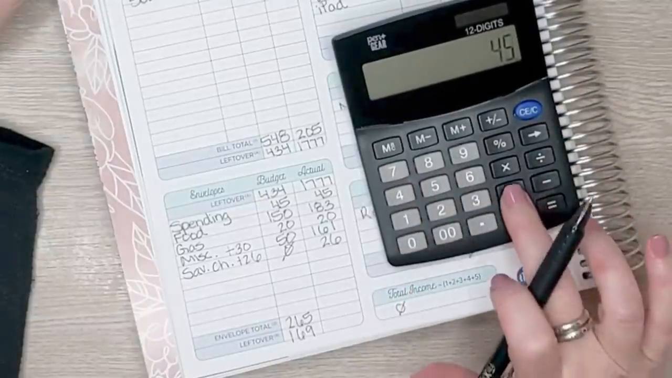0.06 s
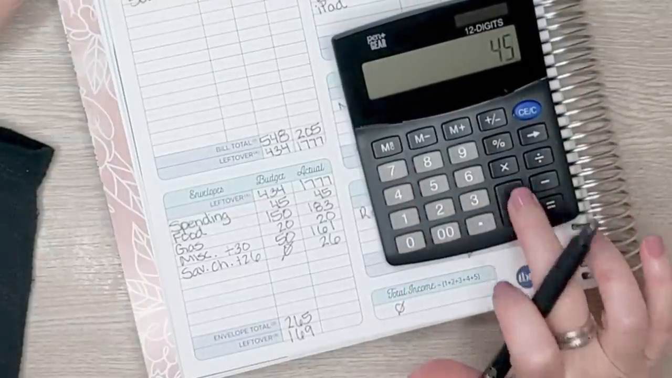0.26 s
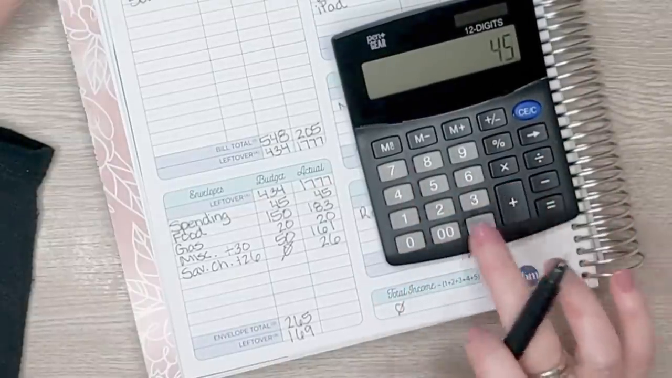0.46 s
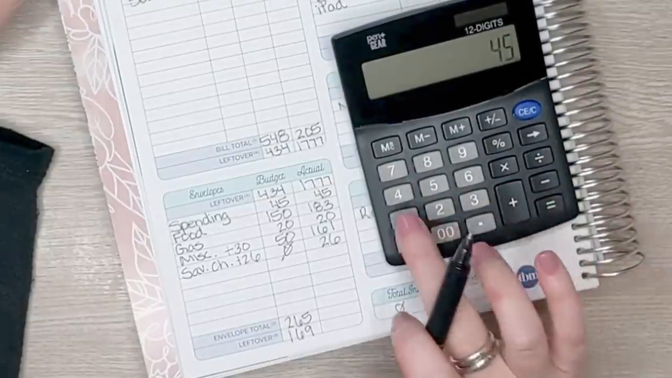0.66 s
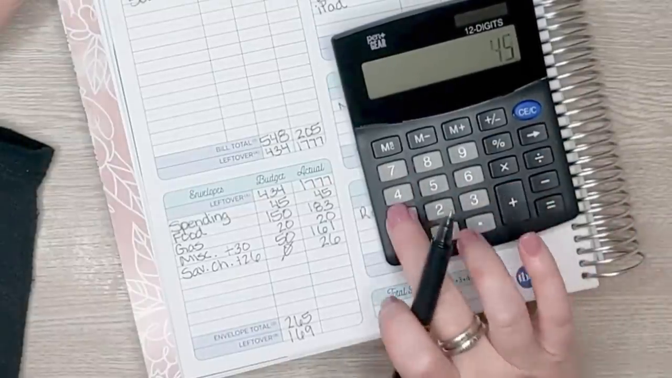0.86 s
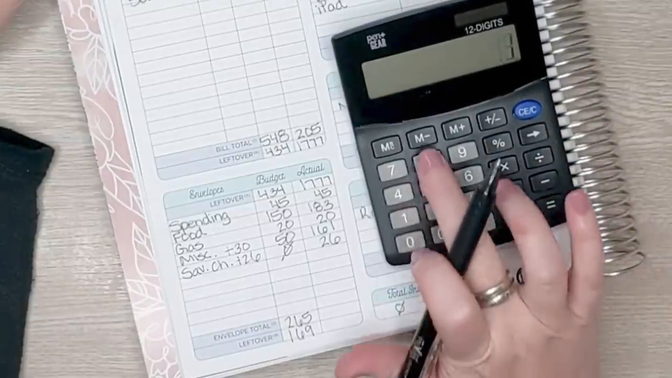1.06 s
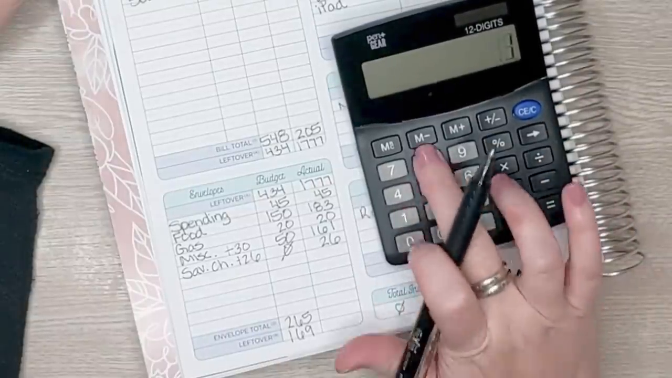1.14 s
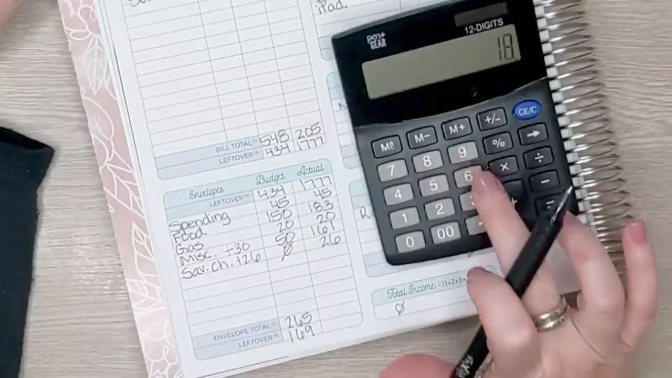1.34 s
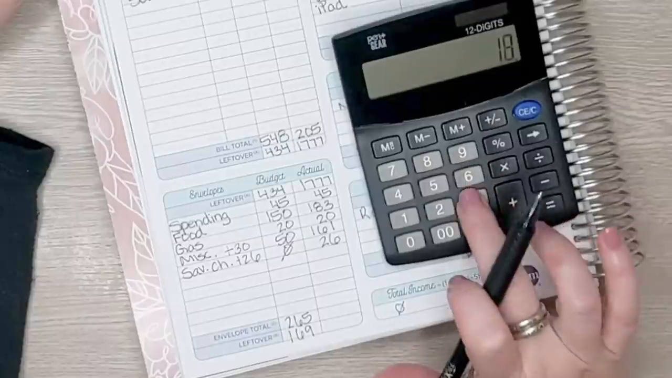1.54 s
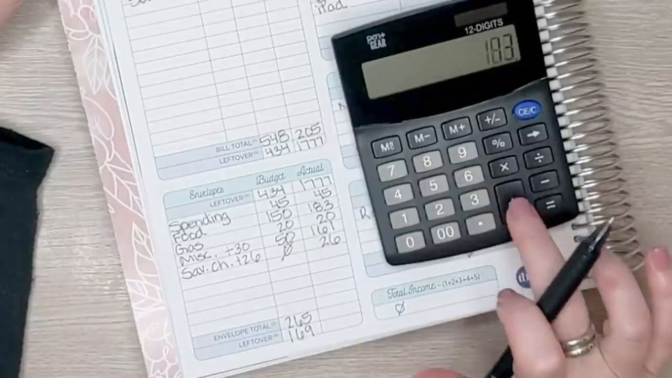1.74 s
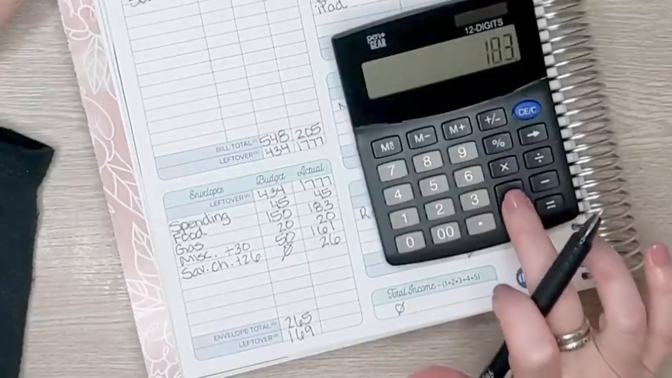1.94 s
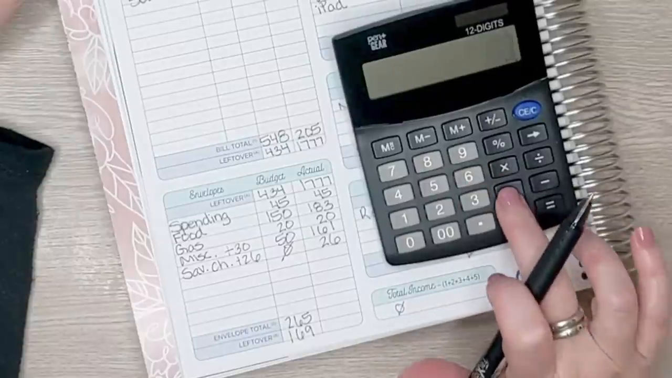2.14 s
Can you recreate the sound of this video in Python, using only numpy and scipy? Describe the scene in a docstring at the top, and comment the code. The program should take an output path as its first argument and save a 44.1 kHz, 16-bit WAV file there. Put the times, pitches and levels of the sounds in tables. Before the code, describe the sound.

Plastic calculator keys click close to the microphone: one firm press, a short gap, then three lighter presses. Each knocks the hollow case and clicks back up, with brief room ring over a low rumble and faint hum.

```python
"""Calculator keys on a desk

Four keys of a plastic desktop calculator are pressed; it lies on a paper planner on a desk.
Each key clicks under the finger, knocks the hollow case as it bottoms out, and clicks again as it
springs back. A small quiet room rings briefly after each stroke, over a low rumble and a faint hum."""
import sys
import numpy as np
from scipy import signal
from scipy.fft import rfft, irfft
from scipy.io import wavfile
from scipy.ndimage import uniform_filter1d

SR = 44100
rng = np.random.default_rng(int(sys.argv[2]) if len(sys.argv) > 2 else 0)


def waveform_to_disk(signal):
    """Save audio, clipped to [-1, 1], as 16-bit WAV at the path in sys.argv[1]."""
    frames = np.transpose(np.atleast_2d(signal))
    scaled = np.clip(frames, -1, 1) * 32767
    samples = np.round(scaled).astype(np.int16)
    wavfile.write(sys.argv[1], SR, samples)


N = 97020

# loose key caps, touched or let go:
# t/s, level/dB, rattle hold/s, ring f/Hz, ring boost/dB, treble tilt/(dB per octave), left-right/dB
CAP_CLICKS = [ (0.2177, -17, 0.0019, 1460, -9, -1, 2), (.2200, -7, 0.0022, 3050, 11, -1, -3),
              (0.3476, -9, 0.0064, 6100, 3, 1.5, 1), (.3492, -6.5, 0.0016, 1495, 10.5, -3.5, -0.5),
              (0.9057, -27.5, 0.005, 2320, 2, -3, -8), (0.9077, -22, 0.0023, 2970, 17, 7, 0.5),
              (0.9101, -16, 0.0069, 1210, 13, 3.5, -1), (1.003, -15.5, 0.004, 2230, 6.5, -2, -1.5),
              (1.0083, -18, 0.0044, 3740, 6.5, -0.5, -1.5), (1.2118, -18, 0.0082, 2000, -3.5, -9.5, 2),
              (1.233, -28.5, 0.0008, 3030, 7, -4, -6), (1.2458, -29, 0.0016, 5070, 12, 9, -1),
              (1.3052, -27.5, 0.0045, 3160, 13, 2, 8.5), (1.3102, -12, 0.0042, 4240, 3.5, 3.5, -0.5),
              (1.622, -17, 0.0037, 2020, 3, 2.5, -2), (1.639, -24.5, 0.0062, 1660, 5, -5, 0),
              (1.7390, -25.5, 0.0016, 3220, 8, 2, 2), (1.748, -25.5, 0.0025, 880, 11.5, 1.5, 15.5),
              (1.7496, -19, 0.004, 2560, 4.5, 0, -7)]
# keys bottoming out: t/s, level/dB, dull above f/Hz, struck spot f/Hz, spot boost/dB,
# low body/dB, desk thud gain/dB
KEY_KNOCKS = [ (0.2201, -4.5, 3530, 600, 8, 4.5, -44), (0.9176, -21, 1250, 470, 17, -1, -41.5),
              (1.2192, -11.5, 1050, 1020, 9, -2.5, -43), (1.6430, -21.5, 1680, 1220, 2.5, 1, -56)]
# modes of the hollow case: f/Hz, relative level/dB, t60/s
CASE_MODES = [(355, -12, 0.087), (473, -14.5, 0.078), (586.5, -10, 0.1), (736, -13, 0.052),
              (864, -4.5, 0.024), (1050, -10.5, 0.0084), (1291, -2, 0.049), (1455, -9, 0.025),
              (2190, -10, .02), (2190, -8, 0.012), (2510, -14, 0.0055), (2900, 0, 0.0067),
              (2974, -5, 0.014)]
# modes of the desk under the planner: f/Hz, relative level/dB, t60/s
DESK_MODES = [(63, -18, 0.4), (110.3, -4.5, 0.38), (131.5, -15.5, 0.17), (184, -36, 0.073)]
# EQ of a rattling cap: f/Hz, gain/dB
CAP_EQ = [(100, -29), (350, -13.5), (650, -4.5), (950, -1), (1150, -2), (1550, 2.5), (1900, 0), (2300, 3),
          (2750, -4), (3400, -2), (4200, -6), (5200, -4), (6100, -3.5), (7500, -9.5), (9500, -17.5),
          (13000, -22), (16000, -23.5)]
# EQ of the crack of the case: f/Hz, gain/dB
CRACK_EQ = [(100, -4), (230, -27.5), (350, -8), (900, -5.5), (1400, 1.5), (1700, -4), (2200, 7.5),
            (3200, -3), (4200, -10), (8000, -1), (16000, -21)]
# stereo lean of the direct sound: f/Hz, left-right/dB
STEREO_LEAN = [(300, 1.5), (700, 2.5), (1400, 5.5), (2500, -3.5), (4500, 1.5), (6200, -1), (9000, 2),
               (14000, -4)]
# colour of the wall reflections: f/Hz, gain/dB
WALL_EQ = [(100, -6), (300, -3), (620, 3), (1000, 1), (1400, -4), (2100, 1), (2950, -0.5), (4100, 0),
           (6000, -3.5), (10000, 1.5), (16000, -0.5)]
# decay of the reverb tail: f/Hz, t60/s
TAIL_T60 = [(150, 1), (600, 0.46), (1500, 0.43), (2900, 0.34), (4500, 0.37), (8000, 0.34), (15000, 0.22)]
# EQ of the rumble and hiss: f/Hz, gain/dB
AIR_EQ = [(15, -44), (31, -22), (42, -11.5), (55, 2.5), (68, -3.5), (82, -12.5), (112, -2.5), (165, -13.5),
          (270, -16.5), (350, -17), (530, -20.5), (1100, -22.5), (2000, -27.5), (5300, -32.5),
          (10000, -38.5), (16000, -46.5)]
# partials of the hum: f/Hz, level/dB
HUM_PARTIALS = [(112, -77), (222, -75), (333, -74)]

AIR_DB, AIR_SPREAD_HZ = -58, 204
CAP_T60_S, RATTLE_ATTACK_S, RATTLE_RELEASE_S = 0.018, 0.00046, 0.0015
CAP_Q, SPOT_Q = 4.5, 3
CRACK_DB, CRACK_DECAY_S, CASE_ATTACK_S, THUD_ATTACK_S = 2.5, 0.0034, 0.00024, 0.0021
REBOUND_DELAY_S, REBOUND_DB = 0.00227, -9
LEFT_LAG_S, SPREAD_HZ = 0.0001, 5450  # the keys sound wide above this pitch
TAIL_DB, TAIL_BUILD_S = -5, 0.0017
EARLY_DB, EARLY_DELAY_S, EARLY_DECAY_S = -11.5, 0.0065, 0.0051
LOW_CUT_HZ, HIGH_CUT_HZ = 39, 15900
HIT_T = np.arange(8192) / SR  # time axis of one hit


def undb(db):
    """Decibels to gain."""
    return 10 ** (np.asarray(db) / 20)


def unit(x):
    """Scale a stereo signal to an average energy of one per channel."""
    return x / np.sqrt(np.sum(x ** 2) / 2)


def fade(t, t60):
    """Exponential decay, 60 dB down after t60."""
    return np.exp(-np.log(1000) * t / t60)


def curve(points, hz):
    """Read a table on a log-frequency axis."""
    f, values = np.array(points, float).T
    return np.interp(np.log(hz + 1), np.log(f), values)


def resonance(f, hz, q, db):
    """Gain in dB of a broad peak of height db at hz."""
    return db / np.sqrt(1 + (q * (f / hz - hz / (f + 1))) ** 2)


def colour(x, db_at):
    """Minimum-phase EQ with the gain db_at(Hz)."""
    n = x.shape[-1]
    gain = undb(db_at(np.fft.rfftfreq(n, 1 / SR)))
    cepstrum = irfft(np.log(gain), n)
    cepstrum[1:n // 2] *= 2
    cepstrum[n // 2 + 1:] = 0
    return irfft(rfft(x) * np.exp(rfft(cepstrum)), n)


def even(x, width_hz=70):
    """Level out the chance peaks and dips in the spectrum of a noise."""
    n = x.shape[-1]
    spectrum = rfft(x)
    power = uniform_filter1d(abs(spectrum) ** 2, size=int(width_hz * n / SR), axis=-1)
    return unit(irfft(spectrum / np.sqrt(power), n))


def stereo(x, spread_hz):
    """Two unrelated signals become a stereo pair, narrow below spread_hz; the right side leads."""
    n = x.shape[-1]
    hz = np.fft.rfftfreq(n, 1 / SR)
    width = np.arctan(hz / spread_hz) / 2
    mid, side = rfft(x) * np.array([np.cos(width), np.sin(width)])
    left = (mid + side) * np.exp(-2j * np.pi * hz * LEFT_LAG_S)
    return irfft(np.array([left, mid - side]), n)


def add(out, at, x):
    """Mix x in at a time in seconds."""
    start = int(at * SR)
    out[:, start:start + x.shape[-1]] += x[..., :N - start]


def room_tone():
    """The bed: low rumble, faint hiss and a slightly wavering hum."""
    noise = stereo(rng.standard_normal((2, N)), AIR_SPREAD_HZ)
    air = unit(colour(noise, lambda f: curve(AIR_EQ, f))) * np.sqrt(N)
    t = np.arange(N) / SR
    drifts = 5 * np.cumsum(rng.standard_normal((len(HUM_PARTIALS), N)), axis=1) / np.sqrt(SR)
    hum = sum(undb(db) * np.sqrt(2) * np.sin(2 * np.pi * hz * t + drift)
              for (hz, db), drift in zip(HUM_PARTIALS, drifts))
    return undb(AIR_DB) * air + hum


def burst(envelope):
    """Dense tiny impacts: a stereo noise burst with an even spectrum."""
    x = rng.standard_normal((2, len(envelope))) * envelope
    for _ in range(3):
        flat = irfft(np.exp(1j * np.angle(rfft(x))))
        x = flat * np.sqrt(envelope)
    return stereo(x, SPREAD_HZ)


def key_clicks():
    """A cap rattles in its guide for a few milliseconds and resonates at its own pitch."""
    out = np.zeros((2, N))
    attack = 1 - np.exp(-HIT_T / RATTLE_ATTACK_S)
    for at, db, hold_s, ring_hz, ring_db, tilt, pan_db in CAP_CLICKS:
        rattle = np.exp(-np.maximum(HIT_T - hold_s, 0) / RATTLE_RELEASE_S)
        grains = burst((rattle + fade(HIT_T, CAP_T60_S)) * attack)

        def cap_eq(f):
            treble = tilt * np.log2(1 + (f / 3500) ** 2) / 2
            return curve(CAP_EQ, f) + resonance(f, ring_hz, CAP_Q, ring_db) + treble

        gains = undb(db + np.array([[pan_db], [-pan_db]]) / 2)
        add(out, at, unit(colour(grains, cap_eq)) * gains)
    return out


def case_ring():
    """The hollow case rings in its modes; the higher ones differ more in phase between the sides."""
    stereo_t = HIT_T - np.array([[LEFT_LAG_S], [0]])
    attack = 1 - np.exp(-HIT_T / CASE_ATTACK_S)
    ring = 0
    for k, (hz, db, t60) in enumerate(CASE_MODES):
        phase = rng.standard_normal((2, 1)) * min(hz / SPREAD_HZ, 2) / 2
        mode = np.sin(2 * np.pi * hz * stereo_t + phase) * fade(HIT_T, t60) * attack
        ring += (-1) ** k * undb(db) * unit(mode)
    return unit(ring)


def case_crack():
    """The short, bright crack of a key hitting its plastic stop."""
    return colour(burst(np.exp(-HIT_T / CRACK_DECAY_S)), lambda f: curve(CRACK_EQ, f))


def desk_thud():
    """The desk answers through the planner with a soft, low thud."""
    ring = sum(undb(db) * np.sin(2 * np.pi * hz * HIT_T) * fade(HIT_T, t60)
               for hz, db, t60 in DESK_MODES)
    return ring * (1 - np.exp(-HIT_T / THUD_ATTACK_S))


def key_knocks():
    """The key hits its stop and rebounds: the case cracks and rings, the desk thuds."""
    out = np.zeros((2, N))
    for at, db, dull_hz, spot_hz, spot_db, body_db, thud_db in KEY_KNOCKS:
        def touch_eq(f):
            body = body_db / (1 + (f / 450) ** 4)
            dulling = 10 * np.log10(1 + (f / dull_hz) ** 8)  # a soft fingertip takes off the top
            return resonance(f, spot_hz, SPOT_Q, spot_db) + body - dulling

        strike = case_ring() + undb(CRACK_DB) * unit(case_crack())
        knock = unit(colour(strike, touch_eq))
        rebound = unit(colour(case_crack(), touch_eq))
        add(out, at, undb(db) * knock)
        add(out, at + REBOUND_DELAY_S, undb(db + REBOUND_DB) * rebound)
        add(out, at, undb(thud_db) * desk_thud())
    return out


def room_reverb(x):
    """A cluster of near reflections, then a diffuse tail that dies sooner in the treble."""
    t = np.arange(SR // 2) / SR
    hz, frame_t, bands = signal.stft(rng.standard_normal((2, len(t))), SR)
    bands = bands * fade(frame_t, curve(TAIL_T60, hz)[:, None])
    tail = signal.istft(bands)[1][:, :len(t)]
    tail = even(tail * (1 - np.exp(-(t / TAIL_BUILD_S) ** 2)))
    early_envelope = (t > EARLY_DELAY_S) * np.exp(-t / EARLY_DECAY_S)
    early = unit(rng.standard_normal((2, len(t))) * early_envelope)
    reflections = stereo(undb(TAIL_DB) * tail + undb(EARLY_DB) * early, spread_hz=564)
    response = colour(reflections, lambda f: curve(WALL_EQ, f))
    return signal.fftconvolve(x, response[:, :SR // 3], axes=1)[:, :N]


def scene():
    """The close keys, coloured a little differently on each side, with reverb over the room tone."""
    keys = key_clicks() + key_knocks()
    left = colour(keys[0], lambda f: curve(STEREO_LEAN, f) / 2)
    right = colour(keys[1], lambda f: -curve(STEREO_LEAN, f) / 2)
    return np.array([left, right]) + room_reverb(keys) + room_tone()


def record(dry):
    """Trim the deepest bass and the very top of the treble."""
    low_cut = signal.butter(4, LOW_CUT_HZ, "high", fs=SR, output="sos")
    high_cut = signal.ellip(10, .1, 70, HIGH_CUT_HZ, fs=SR, output="sos")
    return signal.sosfilt(high_cut, signal.sosfilt(low_cut, dry))


dry = scene()
out = record(dry)
waveform_to_disk(out)
```